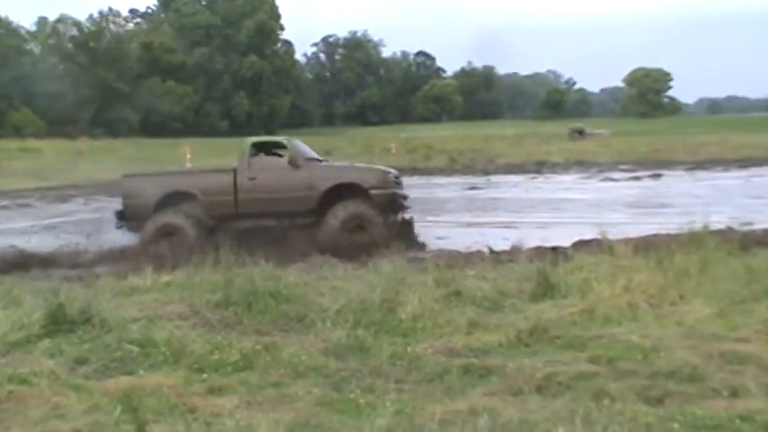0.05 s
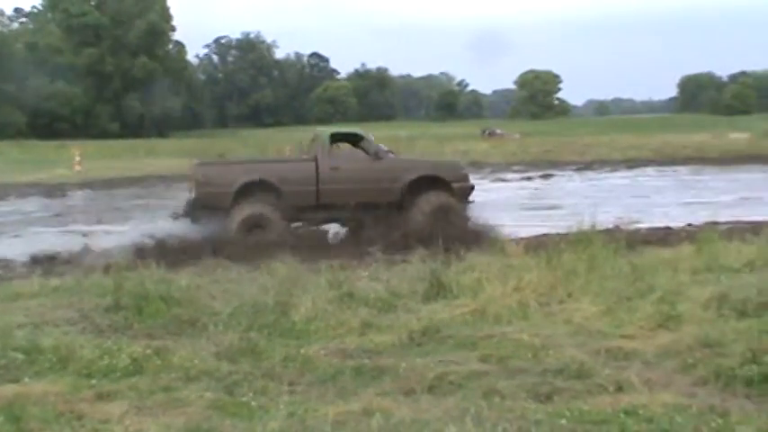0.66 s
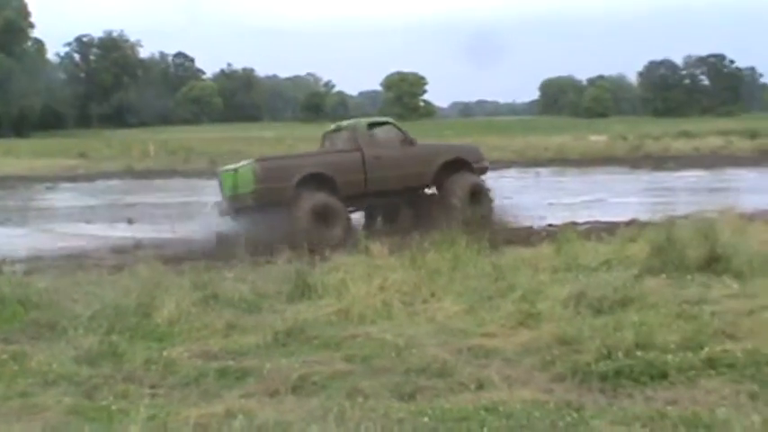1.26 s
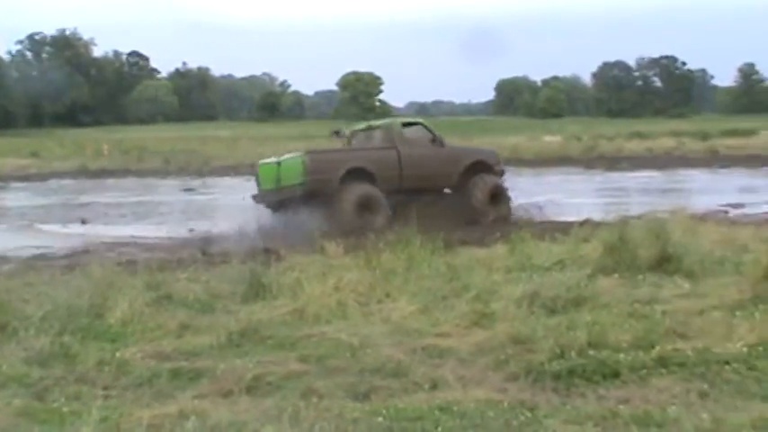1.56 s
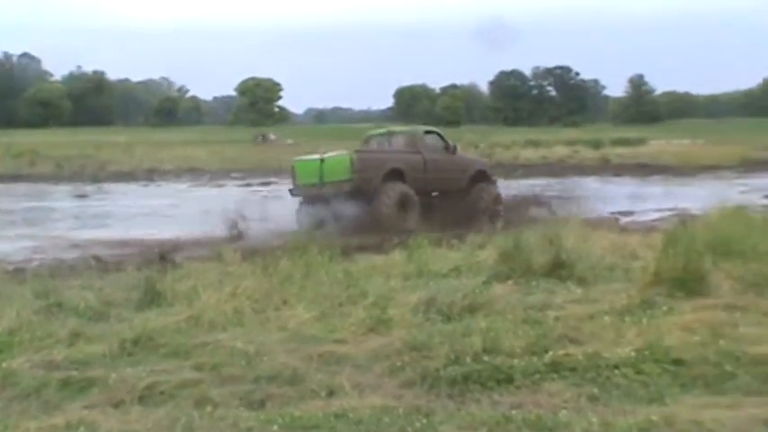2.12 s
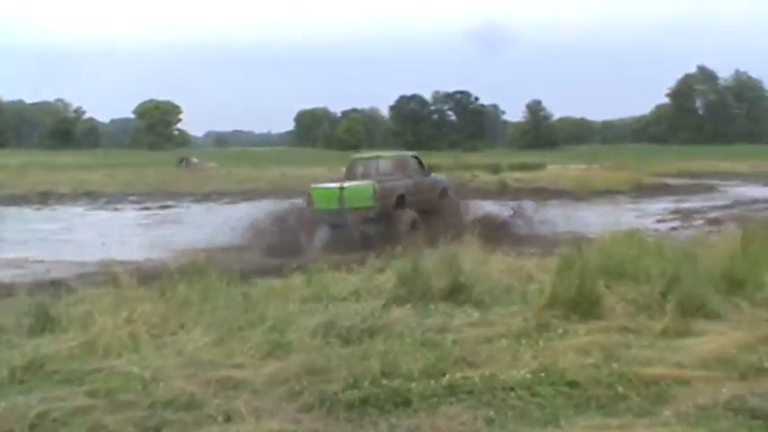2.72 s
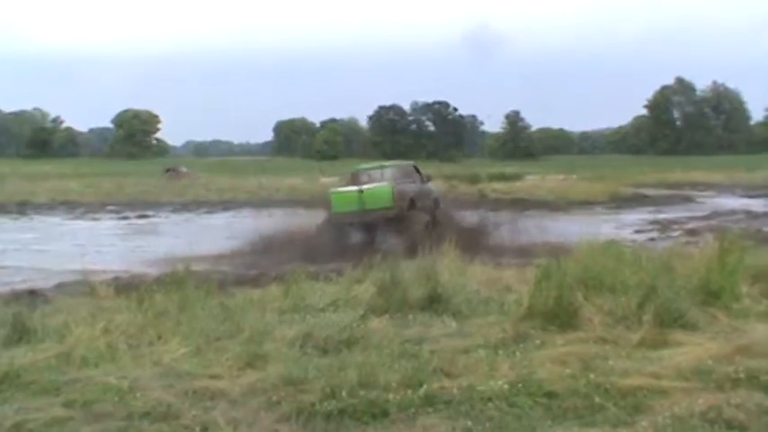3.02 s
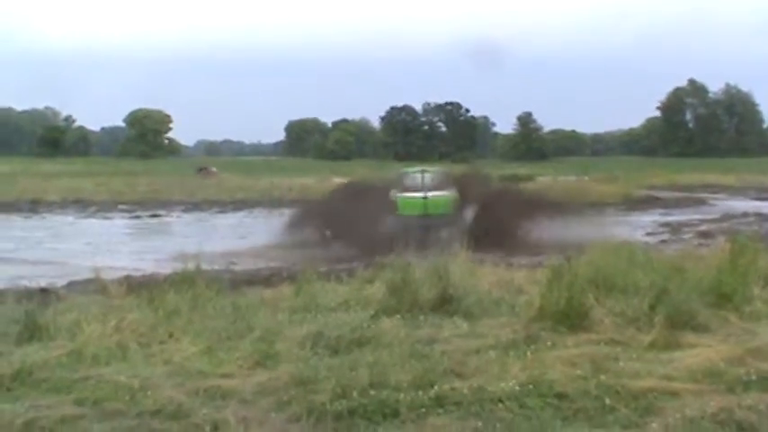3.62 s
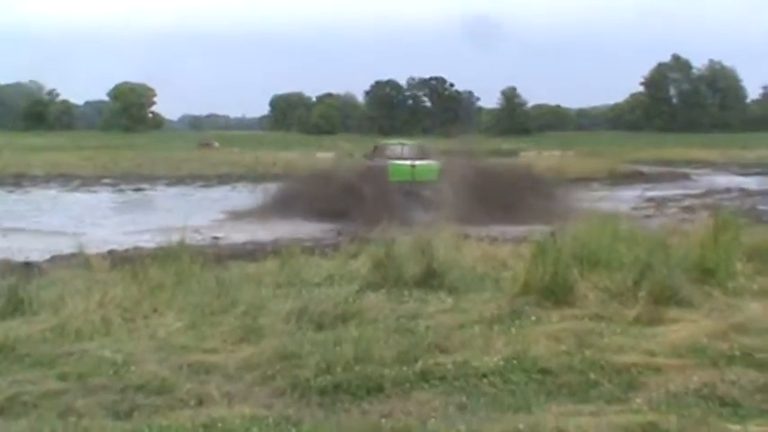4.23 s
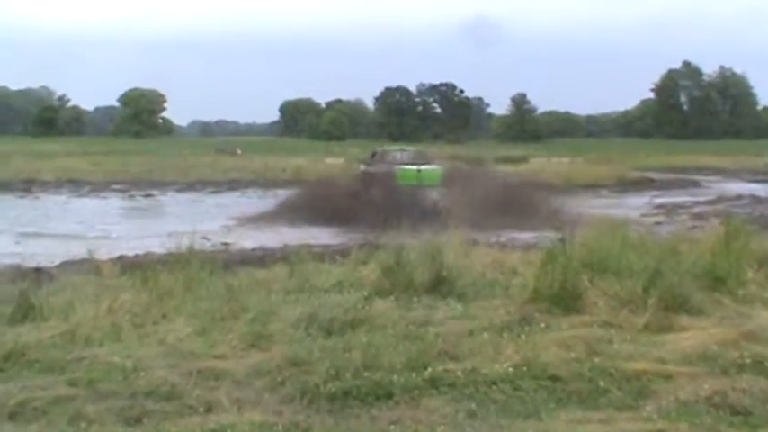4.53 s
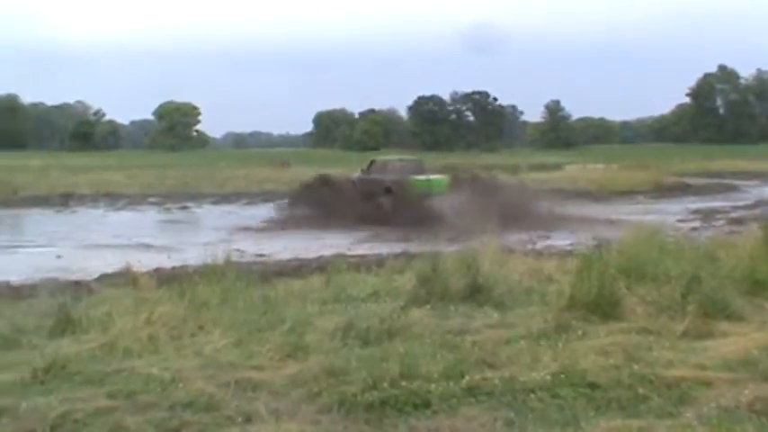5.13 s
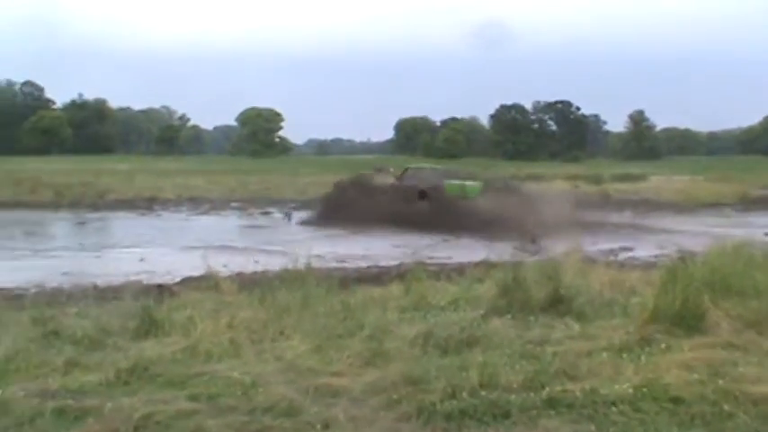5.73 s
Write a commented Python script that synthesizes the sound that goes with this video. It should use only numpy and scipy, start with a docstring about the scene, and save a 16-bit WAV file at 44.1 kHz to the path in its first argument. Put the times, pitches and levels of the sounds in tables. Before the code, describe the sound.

A pickup with a loud open exhaust drives through a flooded field at full throttle. The engine drones and crackles while the tyres churn with a low rumble and fling hissing, spattering mud. It passes close, turns away and revs higher. The throttle lifts once with a dull thump, then the engine picks up and roars on farther off. Faint wind touches the microphone.

```python
"""A V8 pickup on open pipes comes at the microphone pair through a flooded field, at full throttle.
Its pipes drone on the orders of the firing cycle, each firing spits gas, and the tyres fling mud and water.
It passes side-on just after one second, turns away, and is heard from behind by three.
The driver lifts off once and the pipes thump; the engine picks up again and churns on, far across the field."""
import sys
import numpy as np
from scipy import signal
from scipy.fft import rfft, irfft
from scipy.io import wavfile
from scipy.ndimage import uniform_filter1d, minimum_filter1d

SR = 44100
rng = np.random.default_rng(int(sys.argv[2]) if len(sys.argv) > 2 else 0)


def materialize(psi):
    """Save the field psi as 16-bit PCM at rate SR to the path in sys.argv[1].

    A 1-D psi becomes a single channel; in a 2-D psi each row is a channel.
    """
    bounded = np.clip(np.atleast_2d(psi).T, -1, 1)
    quanta = np.round(bounded * 32767).astype(np.int16)
    wavfile.write(sys.argv[1], SR, quanta)


N = 263277
T = np.arange(N) / SR
HZ = np.fft.rfftfreq(N, 1 / SR)


def amp(db):
    """Decibels to gain."""
    return 10 ** (np.asarray(db) / 20)


def unit(x):
    """Scales to rms 1."""
    return x / np.sqrt(np.mean(x ** 2) + 1e-20)


def steady(x, seconds=0.135):
    """Scales to a running rms of 1."""
    return x / np.sqrt(abs(uniform_filter1d(x ** 2, int(seconds * SR))) + 1e-12)


def over_time(points):
    """Joins (seconds, value) points, sample by sample."""
    return np.interp(T, *np.transpose(points))


def over_hz(points):
    """Joins (Hz, value) points on a log axis."""
    hz, value = np.transpose(points)
    return np.interp(np.log(HZ + 1), np.log(hz + 1), value)


def colour(x, spectrum):
    """Filters by (Hz, dB) points."""
    return irfft(rfft(x) * amp(over_hz(spectrum)), N)


def wander(hz, step=64):
    """Slow random drift of rms 1, up to about hz."""
    slow = T[::step]
    rolloff = 1 + (np.fft.rfftfreq(len(slow), step / SR) / hz) ** 4
    drift = irfft(rfft(rng.standard_normal(len(slow))) / rolloff, len(slow))
    return unit(np.interp(T, slow, drift))


def swell(centre, length):
    """A smooth rise to 1 and back."""
    return np.exp(-(2 * (T - centre) / length) ** 2)


def swells(rows):
    """Sums a swell for each event; one curve for each dB column."""
    return sum(np.outer(dbs, swell(centre, length)) for centre, length, *dbs in rows)


# The truck as seen from the microphone. Each row: time in seconds, view
# (-1 approaching, 0 side-on, 1 turning, 2 from behind, 3 far off).
HEADING = [(.42, -1), (.72, -0.72), (1.17, 0), (1.48, 1.2), (1.85, 0.7), (2.1, 1), (2.95, 2), (3.75, 2),
           (4.7, 3), (5.3, 3)]

def by_view(versions):
    """Blends as the truck turns: five versions run from approaching to far off, four from side-on."""
    views = np.arange(4 - len(versions), 4)
    view = np.clip(over_time(HEADING), views[0], views[-1])
    return sum(np.maximum(1 - abs(view - k), 0) * v for k, v in zip(views, versions))


def radiate(x, spectra):
    """Sound reaches the microphone with a colour that depends on the view."""
    return steady(by_view([unit(colour(x, s)) for s in spectra]))


# Wind right on the microphone. Each row: frequency in Hz, relative level in dB.
BREEZE_COLOUR = [(10, -10), (25, -13), (55, 7), (90, 5), (200, -29), (500, -60)]

def breeze(level_db=-45):
    """Air buffets each microphone port on its own."""
    return amp(level_db) * np.array([unit(colour(rng.standard_normal(N), BREEZE_COLOUR)) for _ in range(2)])


def field_scatter(x, level_db=-18, t60=0.12):
    """Faint scatter from the ground and banks, different at each port."""
    t = T[:SR // 2]
    taps = rng.standard_normal((2, len(t))) * amp(-60 * t / t60) * (t > .004)
    return amp(level_db) * signal.oaconvolve(x[None], taps / np.linalg.norm(taps[0]), axes=1)[:, :N]


# At the microphone pair. Each row: frequency in Hz, left minus right in dB.
PORT_BALANCE = [(40, 4.5), (110, 6.7), (180, 6), (270, 3.4), (450, 1), (650, -2.7), (850, -.5), (1300, -.7),
                (2050, 0), (2300, 2), (2750, 2.7), (3100, -.3), (3400, 2.3), (4000, .2)]
# Each row: frequency in Hz, left's phase lead in radians.
PORT_LEAD = [(40, -.4), (130, -.6), (230, -1), (540, -.85), (750, -.3), (1400, 0), (2050, -.35),
             (2250, .35), (2900, -.25), (3400, 0)]

def ports(x):
    """The two microphone ports differ in level and phase, mostly in the bass."""
    half = amp(over_hz(PORT_BALANCE) / 2) * np.exp(.5j * over_hz(PORT_LEAD))
    pair = np.array([half, 1 / half])
    return irfft(rfft(x) * pair / abs(pair.mean(0)), N)


# Mud under the tyres, out in the field. Each row: frequency in Hz, relative level in dB.
MUD_COLOUR = [(15, -28), (40, -21), (90, -4), (200, 2.5), (300, 3), (420, -5), (600, -24), (1200, -94)]

def mud_churn(level_db, lumps_db=5.0, lumps_hz=8.1):
    """The tyres heave through deep mud: a lumpy low rumble."""
    return amp(level_db + lumps_db * wander(lumps_hz)) * unit(colour(rng.standard_normal(N), MUD_COLOUR))


# One thump on the approach, three as the driver lifts off.
# Each row: centre in seconds, level in dB, pitch in Hz, length in seconds.
THUMPS = [(.765, -28, 52, .07), (3.382, -20, 72, 0.03), (3.423, -24, 132, 0.053), (3.49, -26, 76, 0.05)]

def thumps():
    """Dull thumps: a few cycles of low pressure under a smooth swell."""
    return sum(amp(db) * swell(centre, length) * np.cos(2 * np.pi * hz * (T - centre))
               for centre, db, hz, length in THUMPS)


# How hard the cylinders spit, one row a view from side-on to far off.
# Each row: eight strengths, which contrast scales to dB.
CYLINDER_STRENGTH = [(-11, 7, -8.5, -10, -12, -7.5, -3, -16), (-6.5, -7, -14, 3, -28, -24, -6, -16),
                     (3, -10, -3, 2, -3, 2, -7, -11), (-15, 1.5, 12.5, -10, -5, 6, -5, 13.5)]

def firings(cycles, scatter_db, contrast):
    """One click for each firing, eight a cycle, sized by its cylinder and by chance."""
    stroke = np.floor(8 * cycles).astype(int)
    fires = np.diff(stroke, prepend=0) > 0
    strength = by_view([np.array(row)[stroke % len(row)] for row in CYLINDER_STRENGTH])
    chance = np.clip(rng.standard_normal(N), -2, 2)
    return fires * amp(contrast * strength + scatter_db * chance)


def bursts(clicks, rise_s):
    """Each click lets out a puff of turbulence that rises fast and dies away."""
    age = T[:2000] / rise_s
    envelope = signal.oaconvolve(clicks, age * np.exp(-age))[:N]
    return unit(envelope * rng.standard_normal(N))


# Spits at the microphone. Each entry: level in dB, from approaching to far off.
SPIT_DB = [-47, -43.5, -36, -49, -53.5]

def spits(cycles, gain_db, low_hz=6800, high_hz=12000):
    """The hardest firings stand out as millisecond chirps, each at a high pitch of its own."""
    clicks = firings(cycles, scatter_db=3.2, contrast=1.5)
    starts = np.flatnonzero(clicks)
    t = T[:400]
    out = np.zeros(N + len(t))
    for i, (pitch, length, glide) in zip(starts, rng.random((len(starts), 3))):
        hz = low_hz * (high_hz / low_hz) ** pitch
        age = t / (.0002 + .00025 * length)
        chirp = np.sin(2 * np.pi * hz * t * (1 + .03 * (glide - .5) * age))
        out[i:i + len(t)] += clicks[i] * age * np.exp(-age) * chirp * low_hz / hz
    return amp(by_view(SPIT_DB) + gain_db) * steady(out[:N], 0.18)


# Treble at the microphone, one list a view from side-on. Each row: frequency in Hz, relative level in dB.
TREBLE_COLOURS = [
    [(1820, -10), (3100, -1), (3410, -13), (4090, 2), (4440, -4), (5180, -2), (5780, -10), (6270, -2.5),
     (6750, -4.5), (7830, -5.5), (9930, -13.5), (11800, -11), (15600, -30)],
    [(1820, -32), (3100, 1), (4260, 3.5), (5250, 0), (5900, 2.5), (6440, -5), (6940, -0.5), (8670, -3),
     (10200, -11.5), (11400, -8), (15600, -18.5)],
    [(1820, -50), (3100, -6.5), (3500, 2), (4780, -1.5), (5220, -1.5), (6020, -6), (6980, -0.5), (7990, -2),
     (9860, -7), (12300, -11.5), (15600, -22)],
    [(1820, -18), (3100, -4.5), (3340, -1.5), (4260, -5), (5180, -5), (6100, -9), (6660, -6), (8210, -5),
     (10500, -16), (12600, -18), (15600, -31)],
]
# From approaching to far off. Each entry: level in dB; below, flung mud and water's share of the power.
TREBLE_DB = [-29.5, -29, -27, -30.5, -36]
SPRAY_SHARE = [0.82, 0.63, 0.5, 0.7, 0.78]

def cracks_and_spray(cycles, gain_db, drops_per_s=1400, drop_db=1.5, mist=1.07):
    """Exhaust cracks mix with the patter and hiss of flung mud."""
    cracks = bursts(firings(cycles, scatter_db=2.0, contrast=.78), rise_s=.001)
    lands = rng.random(N) < drops_per_s / SR
    drops = lands * amp(drop_db * np.minimum(rng.exponential(1, N), 4))
    spray = unit(bursts(drops, rise_s=0.00074) + mist * rng.standard_normal(N))
    share = np.clip(by_view(SPRAY_SHARE), 0, 1)
    mix = np.sqrt(1 - share) * steady(cracks) + np.sqrt(share) * spray
    return amp(by_view(TREBLE_DB) + gain_db) * radiate(mix, TREBLE_COLOURS)


# The pipe mouths, one list a view from side-on. Each row: frequency in Hz, relative level in dB.
RASP_COLOURS = [
    [(740, -13), (1250, -12), (1350, -12), (1680, -1), (1820, 1.5), (2080, -6), (2270, -16), (2560, -4),
     (3110, -11.5), (3400, -16), (4420, -32), (7480, -120)],
    [(740, -26), (1250, -11), (1310, -6.5), (1560, 3), (1780, 5), (1910, 3), (2150, -15), (2450, -1),
     (3210, -13.5), (3400, -10), (4420, -22), (7480, -120)],
    [(740, -9.5), (1250, -10.5), (1570, 2.5), (1750, -1.5), (1880, -0.5), (2090, -10.5), (2370, -0.5),
     (2790, 1), (3110, -13), (3400, -17), (4420, -33), (7480, -120)],
    [(740, -10.5), (1250, -11.5), (1790, -4), (2010, -16.5), (2230, -7), (2430, -5), (2590, -4.5),
     (3050, -18.5), (3230, -26), (3400, -16.5), (4420, -54), (7480, -120)],
]
# Each entry: level in dB, from approaching to far off.
RASP_DB = [-26.5, -24.5, -24.5, -31.5, -33]

def rasp(cycles, gain_db, wash=0.71, ring_s=0.0019):
    """Gas tears out of the pipe mouths at each firing and rings the steel, over the wash of the tyres."""
    clicks = firings(cycles, scatter_db=1.3, contrast=0.51)
    age = T[:1000] / ring_s
    ring = age * np.exp(-age) * rng.standard_normal(len(age))
    steel = .6 * unit(signal.oaconvolve(clicks, ring)[:N])
    mix = bursts(clicks, rise_s=0.0015) + steel + wash * rng.standard_normal(N)
    return amp(by_view(RASP_DB) + gain_db) * radiate(mix, RASP_COLOURS)


# The pipes' midrange, one list a view from side-on. Each row: frequency in Hz, relative level in dB.
BARK_COLOURS = [
    [(330, -34), (400, 9.5), (470, -3), (570, -7), (760, -9.5), (860, -8), (1050, -11), (1250, -19),
     (1450, -32)],
    [(330, -33), (400, -15), (470, -16), (600, -10), (850, 4.5), (1080, 3), (1250, -6), (1450, -36)],
    [(330, -39), (420, 2.5), (560, 8.5), (680, -0.5), (820, 2), (1050, -2), (1250, -8), (1450, -38)],
    [(330, -63), (430, -3), (570, -2.5), (680, -2.5), (880, 1), (1100, -5.5), (1250, -13), (1450, -41)],
]
# Each entry: gas noise's share of the power, from side-on to far off.
GAS_SHARE = [.5, .22, .17, .14]
# Below and above about 740 Hz. Each entry: level in dB, from approaching to far off.
THROAT_DB = [-38.5, -39, -40, -36, -30]
SNARL_DB = [-34, -36, -27.5, -35, -35]

def bark(cycles, throat_gain_db, snarl_gain_db, waver=.6, waver_hz=2.5):
    """The higher orders growl in the pipes, roughened by gas: a low throat and a brighter snarl."""
    growl = 0
    for order in range(12, 50):
        tone = np.exp(2j * np.pi * (order * cycles + rng.random()))
        drift = wander(waver_hz) + 1j * wander(waver_hz)  # in level and phase
        growl += (tone * (1 + waver * drift)).real
    gas = bursts(firings(cycles, scatter_db=0.5, contrast=0.36), rise_s=0.0018)
    share = np.clip(by_view(GAS_SHARE), 0, 1)
    mix = np.sqrt(1 - share) * radiate(growl, BARK_COLOURS) + np.sqrt(share) * radiate(gas, BARK_COLOURS)
    low = colour(mix, [(690, 0), (740, -6), (850, -40)])
    throat = amp(by_view(THROAT_DB) + throat_gain_db) * steady(low)
    snarl = amp(by_view(SNARL_DB) + snarl_gain_db) * steady(mix - low)
    return throat + snarl


# The drone across the field. Each row: order of the firing cycle, then its base level in dB
# approaching, side-on, turning, from behind and far off.
DRONE_ORDERS = [(2, -44, -42, -50, -43.5, -38.5), (3, -34, -36, -33, -35.5, -23),
                (4, -30, -28.5, -33.5, -28.5, -34), (5, -17.5, -25, -21.5, -24, -31.5),
                (6, -44, -34.5, -25, -25.5, -27.5), (7, -50, -43, -46, -37.5, -29),
                (8, -27, -30.5, -22.5, -19, -20.5), (9, -43, -49, -36.5, -38, -30.5),
                (10, -40, -34, -35, -37, -36.5), (11, -25.5, -17.5, -25, -31.5, -34.5),
                (12, -33, -40, -36, -47, -61), (13, -31.5, -27, -29, -44, -35.5),
                (14, -53, -38, -54, -47, -41), (16, -35.5, -41, -46, -38.5, -50),
                (19, -53, -47.5, -48, -47, -45), (24, -50, -55, -44.5, -35.5, -50)]
# Each row: centre in Hz, width in Hz, lift in dB.
PIPE_RESONANCES = [(125, 12, 2), (265.7, 69, 4.5), (860, 55, 3.5)]

def drone(cycles, speed, flutter=0.042, shimmer=0.12, dispersion=1.22, racing_db_per_hz=0.85, recent_s=2.3):
    """Low orders slide through the pipe resonances; uneven combustion shakes them together and apart."""
    bank = np.array([1, 3, 4, 6]) / 8  # one bank fires at uneven steps of the cycle
    # the upper orders harden as the engine races above its recent speed
    racing_db = racing_db_per_hz * (speed - uniform_filter1d(speed, int(recent_s * SR)))
    out = np.zeros(N)
    for order, *view_db in DRONE_ORDERS:
        pipe_db = sum(db / (1 + (2 * (order * speed - hz) / width) ** 2) for hz, width, db in PIPE_RESONANCES)
        level_db = by_view(view_db) + pipe_db + racing_db * np.interp(order, (4.4, 13), [0, 1])
        bank_phase = np.angle(np.exp(-2j * np.pi * order * bank).sum() + 1e-6)
        phase = bank_phase - dispersion * order ** 2  # the pipe smears each pulse
        tone = np.cos(2 * np.pi * order * cycles + phase)
        out += amp(level_db) * (1 + shimmer * wander(hz=6)) * tone
    return np.sqrt(2) * out * (1 + flutter * wander(hz=106))


def throttle_lift(start_s=3.35, shut_s=0.041, coast_s=0.13, reopen_s=0.21):
    """The driver lifts off once: how far the throttle is shut, 0-1."""
    return np.interp(T, start_s + np.cumsum([0, shut_s, coast_s, reopen_s]), [0, 1, 1, 0])


# The engine sags and recovers as the tyres grip and slip.
# Each row: time in seconds, four-stroke cycles a second.
ENGINE_SPEED = [(0.0, 27.5), (0.35, 24.6), (0.48, 24.9), (0.8, 26.6), (1.05, 25.8), (1.25, 26.4),
                (1.36, 28.1), (1.49, 28.7), (1.73, 26.3), (1.89, 27.2), (2.03, 29.1), (2.21, 30.2),
                (2.44, 29.0), (2.83, 34.6), (3.06, 32.8), (3.36, 35.3), (3.47, 31.8), (3.82, 35.6),
                (4.04, 33.7), (4.19, 33.8), (4.46, 35.9), (4.64, 34.2), (4.97, 35.1), (5.25, 34.5),
                (5.39, 35.1), (5.47, 34.0), (5.75, 33.8), (5.97, 35.5)]
# The tyres throw up sheets of mud and water. Each row: centre and length in seconds, treble lift in dB.
SPLASHES = [(.32, 0.093, 2.5), (.85, .15, 5), (1.35, 0.083, 1.5), (1.75, 0.26, 3), (2.05, 0.12, 2),
            (2.42, 0.22, 3), (3.83, 0.21, 3), (5.2, 0.35, 4.5), (5.48, 0.14, 4.5), (5.88, 0.53, 6.5)]
# The pipes flare up. Each row: centre and length in seconds, then throat, snarl and rasp gain in dB.
PIPE_SURGES = [(.08, 0.22, 3, 3, -1), (.4, .16, 2, -2, 1), (1.35, 0.18, 6.5, -2, 2),
               (2.0, 0.44, 3, 4.5, 0.5), (2.68, 0.49, -0.5, 6, 3.5), (3.2, 0.49, -1, 3, 2),
               (4.56, .2, 1.5, 1.5, 1), (5.22, 0.19, 3.5, 1, 5.5), (5.4, 0.22, 5, 9, 2.5),
               (5.72, 0.44, 2, 4, 2.5)]
# The drone leans left as the truck passes. Each entry: left minus right in dB, from side-on to far off.
DRONE_LEAN_DB = [0.97, .5, 0.07, -0.078]

def scene(waver_hz=10.2, wash_follow=0.064, spit_follow=2.4):
    """All the engine's layers turn on one crankshaft, and follow the truck's heading and its throttle."""
    speed = over_time(ENGINE_SPEED)
    cycles = np.cumsum(speed) / SR
    shut = throttle_lift()
    splash_db, = swells(SPLASHES)
    throat_surge_db, snarl_surge_db, rasp_surge_db = swells(PIPE_SURGES)
    # each layer wavers, and drops while the throttle is shut
    bark_db = 1.57 * wander(waver_hz) - 5.5 * shut
    rasp_db = 0.8 * wander(waver_hz) - 5.5 * shut
    treble_db = 0.5 * wander(waver_hz) - 7 * shut
    upper = bark(cycles, bark_db + throat_surge_db, bark_db + snarl_surge_db)
    upper += rasp(cycles, rasp_db + rasp_surge_db + wash_follow * splash_db)
    upper += cracks_and_spray(cycles, treble_db + splash_db)
    upper += spits(cycles, treble_db + spit_follow * splash_db)
    low = amp(-10 * shut) * drone(cycles, speed)
    lean = amp(by_view(DRONE_LEAN_DB) * np.array([[1], [-1]]) / 2)
    mud = ports(mud_churn(level_db=-35))
    mud += np.array([mud_churn(level_db=-30) for _ in range(2)])  # each port's own rumble
    return lean * ports(low) + ports(upper + thumps()) + mud + field_scatter(upper) + breeze()


def record(dry, gain_db=-0.06, ceiling=.83, hold_samples=300, edge_hz=15850):
    """Behind the microphone a quick limiter holds the highest peaks down; then a low-pass."""
    dry = dry * amp(gain_db)
    gain = np.minimum(1, ceiling / (abs(dry).max(0) + 1e-9))
    limited = dry * uniform_filter1d(minimum_filter1d(gain, hold_samples), hold_samples)
    lowpass = signal.firwin(1023, edge_hz, window=("kaiser", 9), fs=SR)
    return signal.oaconvolve(limited, lowpass[None], "same")


dry = scene()
out = record(dry)
materialize(out)
```